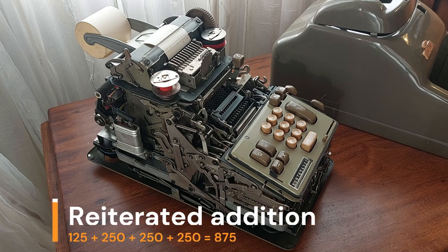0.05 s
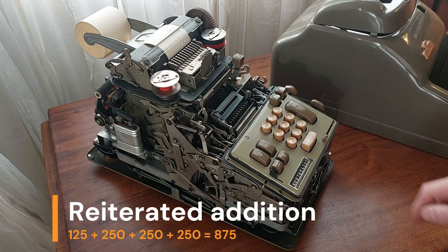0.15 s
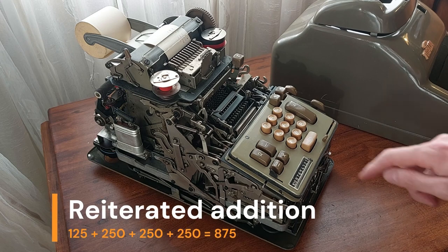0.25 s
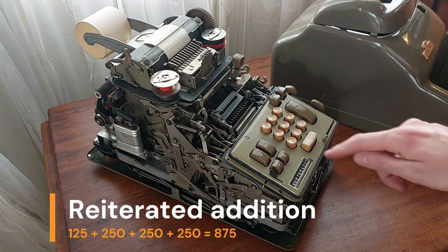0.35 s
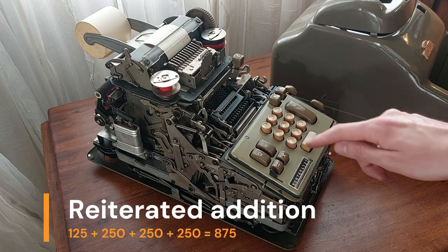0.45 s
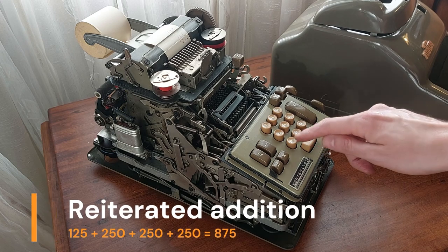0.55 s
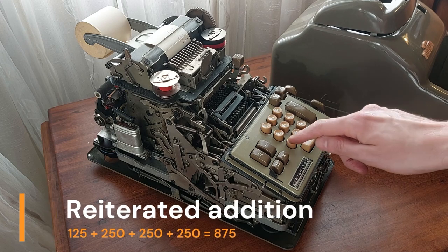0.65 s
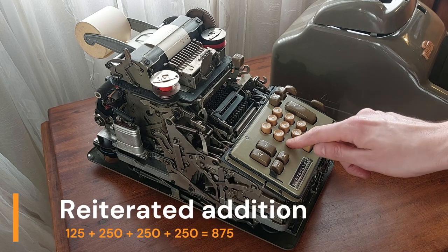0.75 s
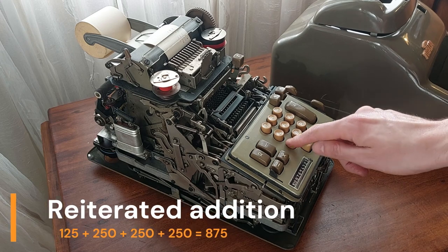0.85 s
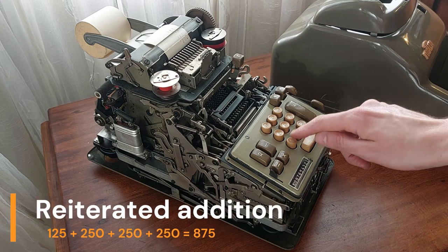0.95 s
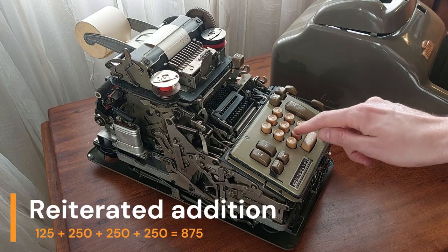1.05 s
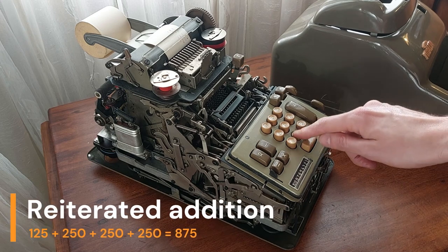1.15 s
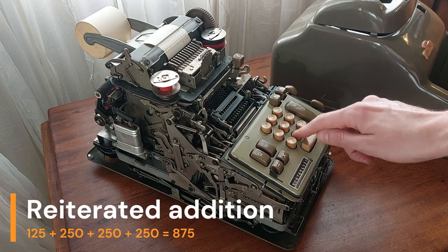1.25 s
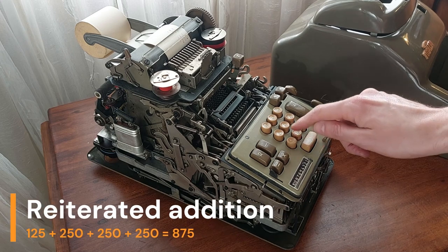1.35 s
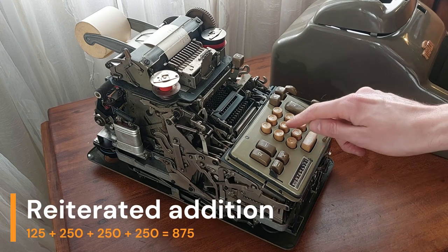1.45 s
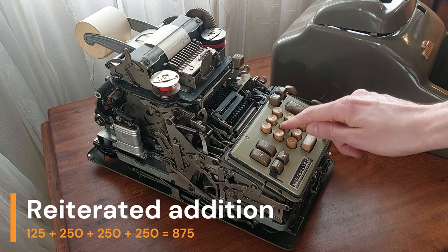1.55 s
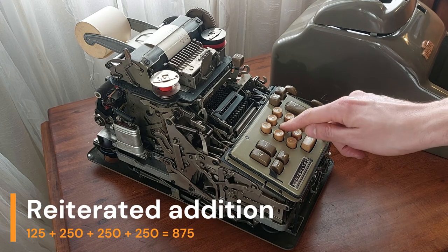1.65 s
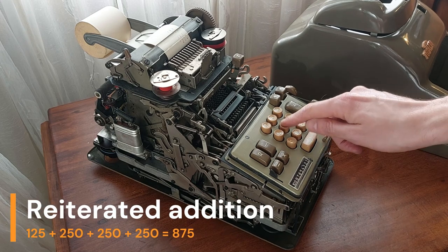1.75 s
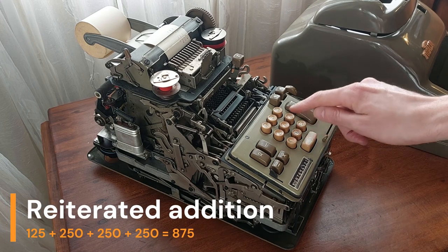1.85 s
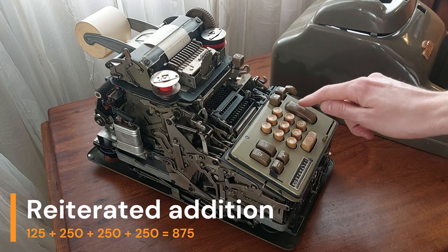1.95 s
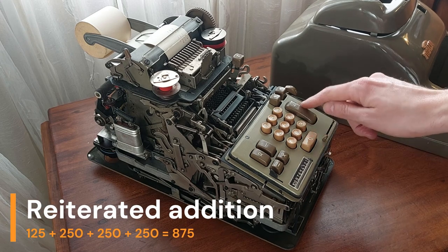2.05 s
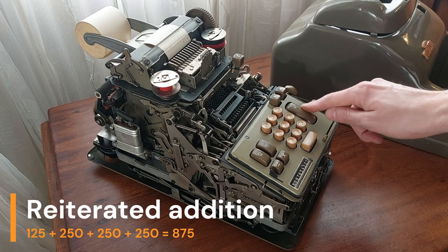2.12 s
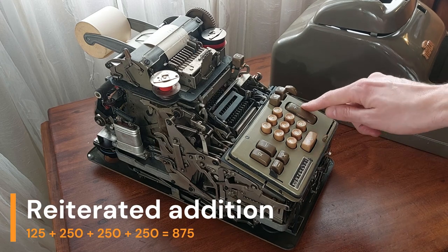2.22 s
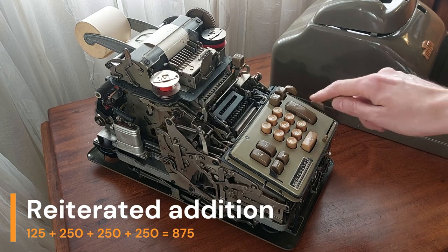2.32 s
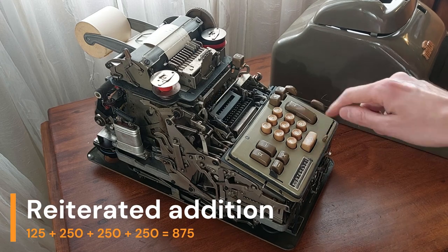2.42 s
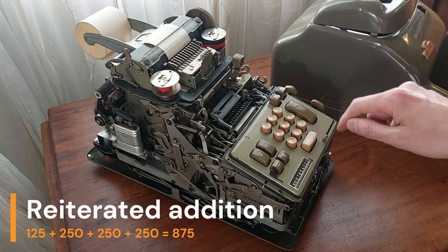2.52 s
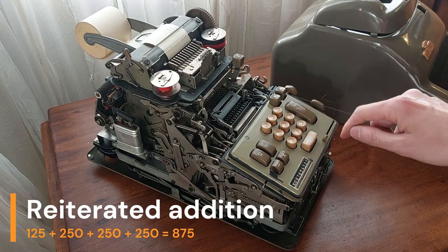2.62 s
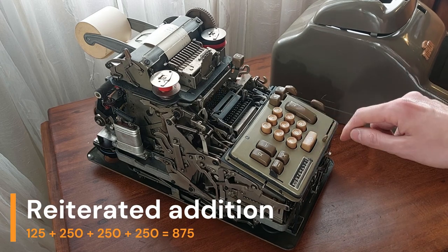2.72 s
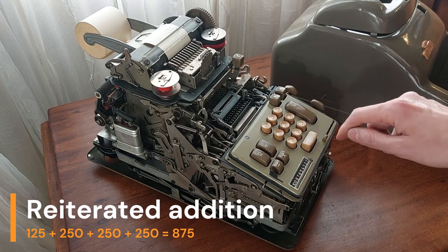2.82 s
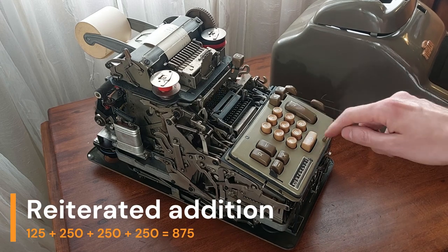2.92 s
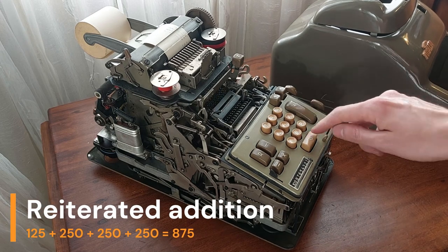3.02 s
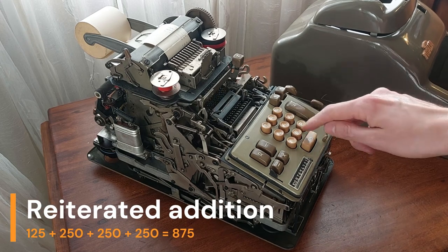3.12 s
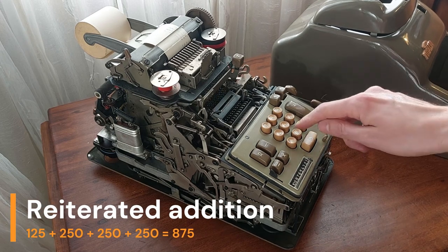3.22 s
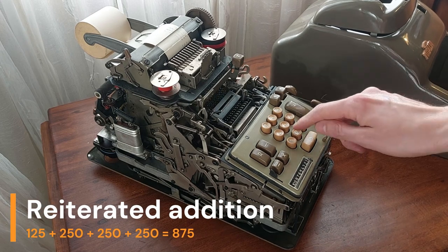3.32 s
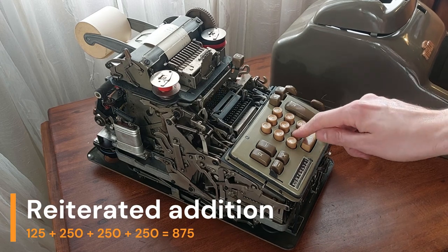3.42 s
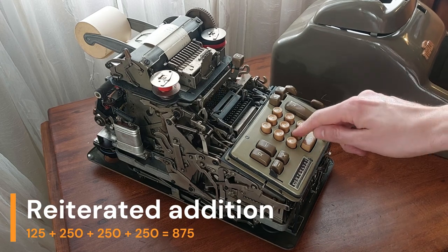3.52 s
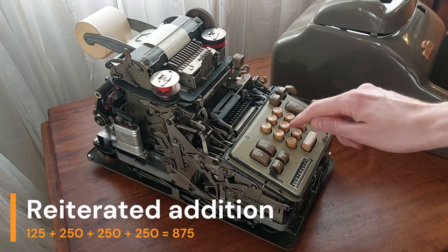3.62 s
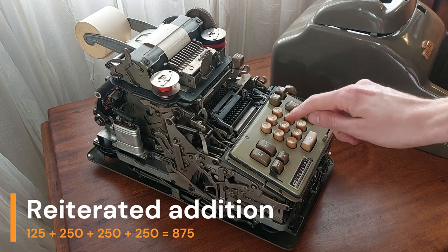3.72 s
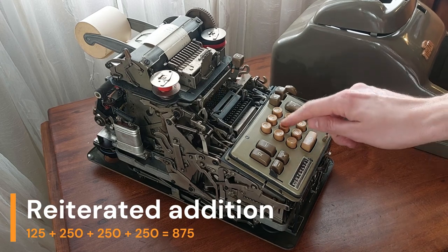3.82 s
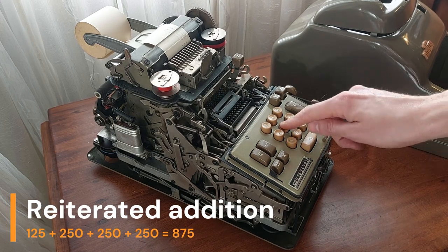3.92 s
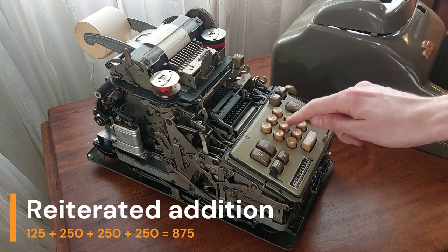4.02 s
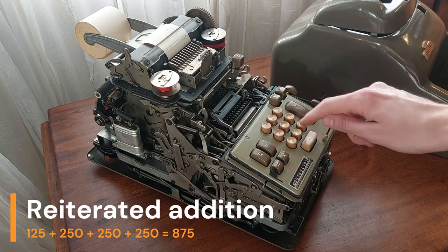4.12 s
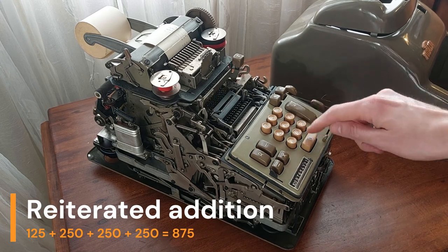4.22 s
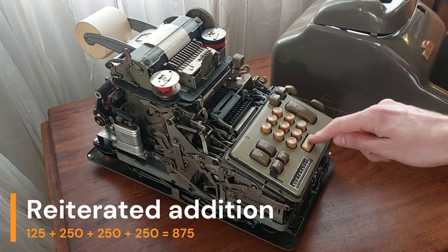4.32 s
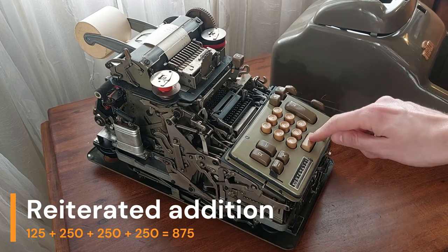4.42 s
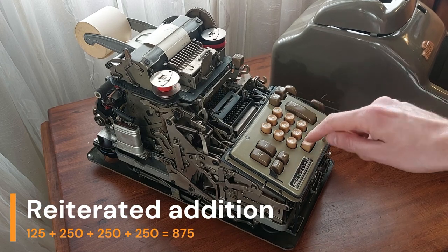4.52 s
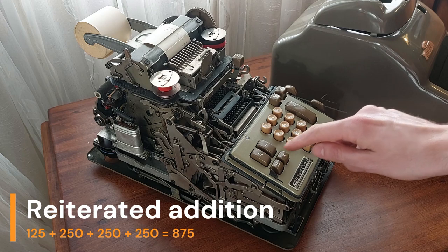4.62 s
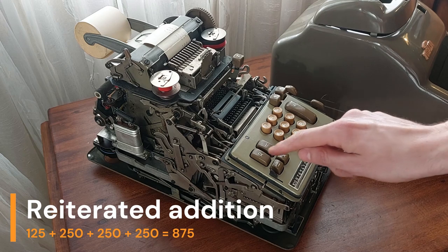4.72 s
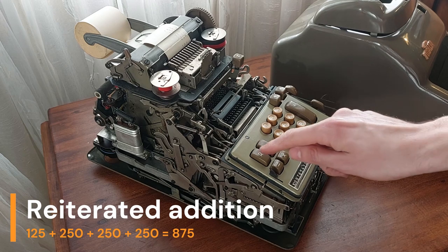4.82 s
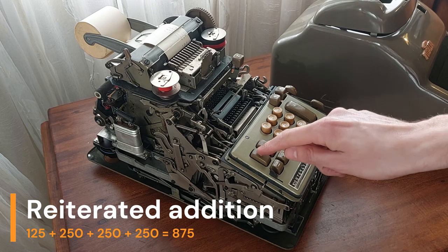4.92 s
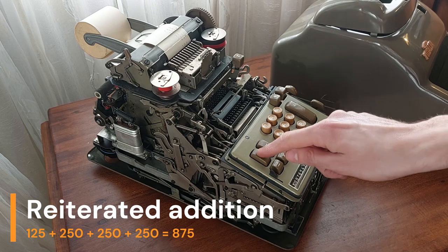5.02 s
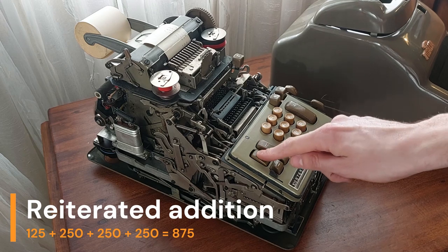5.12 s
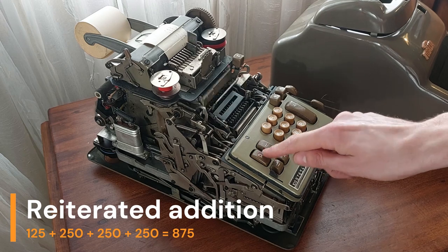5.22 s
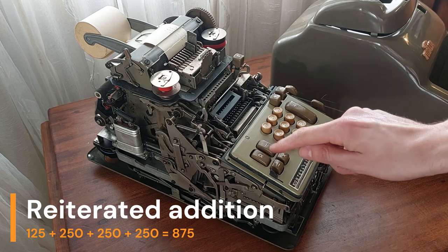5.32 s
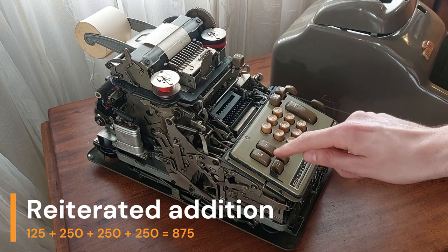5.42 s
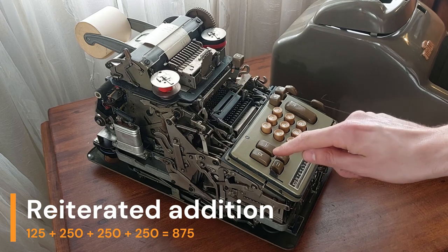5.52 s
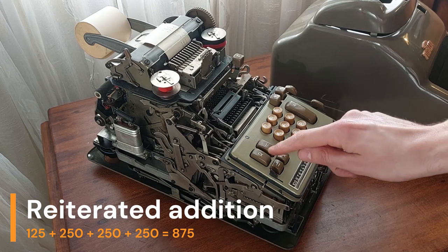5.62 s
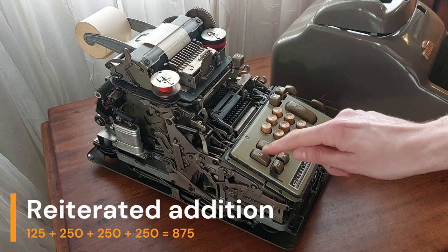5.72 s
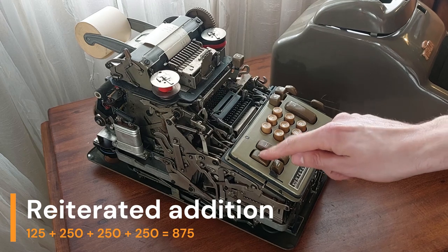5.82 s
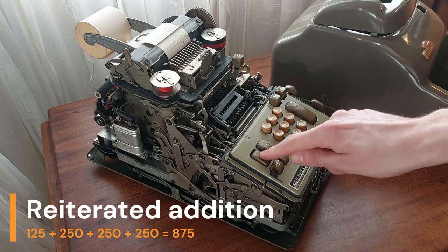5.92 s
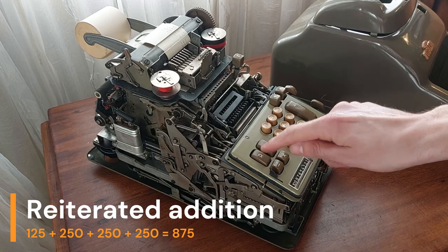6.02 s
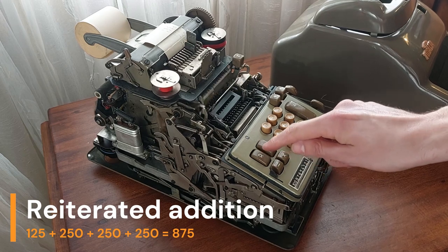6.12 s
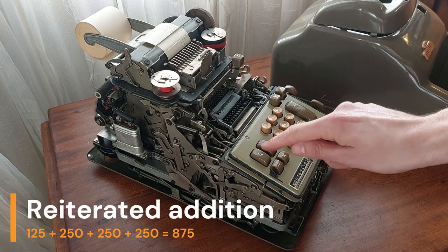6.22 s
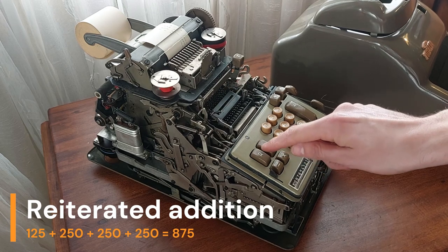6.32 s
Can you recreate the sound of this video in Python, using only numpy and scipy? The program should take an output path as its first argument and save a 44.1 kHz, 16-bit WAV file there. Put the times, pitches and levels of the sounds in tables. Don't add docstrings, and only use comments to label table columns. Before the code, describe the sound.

Close up in a small room, a mechanical adding machine's keys clack down and spring back, between short bursts of motor-driven metallic clatter.

```python
import sys
import numpy as np
from scipy import signal
from scipy.fft import rfft, irfft, next_fast_len
from scipy.io import wavfile

SR = 44100
rng = np.random.default_rng(int(sys.argv[2]) if len(sys.argv) > 2 else 0)


def materialize(psi):
    bounded = np.clip(np.atleast_2d(psi).T, -1, 1)
    quanta = np.round(bounded * 32767).astype(np.int16)
    wavfile.write(sys.argv[1], SR, quanta)


def volts_from_db(level):
    exponent = np.asarray(level, float) / 20
    return 10 ** exponent


N = 280035
SIZE = next_fast_len(N)
FREQ = np.maximum(np.fft.rfftfreq(SIZE, 1 / SR), 1)
TIME = np.arange(N) / SR

# (snap time [s], snap level [dB], travel from first contact [ms], contact level [dB],
# bottoming level [dB])
KEYS_DOWN = [
    (0.9922, -1, 21, -22, -25),
    (1.4123, -4.5, 41, -20.5, -19),
    (1.8576, -12.5, 23, -21.5, -13),
    (3.6581, -17.5, 18, -28, -35),
    (4.129, -16, 17.4, -18, -11.5),
    (4.5628, -13.5, 10.2, -13, -12),
]
# (stop time [s], stop level [dB], catch level [dB], rebound delay [ms],
# thump over click [dB])
KEYS_UP = [
    (1.1963, -14.5, -22.5, 13.6, -18),
    (1.5845, -13, -26, 13.4, -12.5),
    (2.0325, -14.5, -23.5, 2.3, -16.5),
    (3.8433, -18.5, -32.5, 12.2, -18.5),
    (4.2674, -13, -25, 21.9, -12.5),
    (4.724, -15.5, -17.5, 9.8, -15),
]
# (time [s], click level [dB], clack over click [dB])
BARS = [
    (2.36, -28, -7),
    (5.3278, -21.5, -9),
    (6.107, -21.5, -8),
]
# (time [s], level [dB])
STRAY = [(1.4624, -22.5), (1.848, -33), (2.3437, -32), (3.705, -30), (4.688, -27), (4.7494, -46),
         (6.0972, -40)]
# (clutch time [s], strength [dB], pace [1 = from rest], head start of turning rotor [ms])
CYCLES = [
    (2.391, -0.1, 1.001, .01),
    (5.3676, 0.64, .999, 0.0063),
    (6.1454, -2, .945, 11),
]
# (time after clutch [ms], click [dB], then over the click: thump [dB], clack [dB],
# fizz [dB])
CAM_BLOWS = [(-25, -17, -7, -12, -12), (-13, -16, -14, -8, -15), (0, -6, -16, -18, -16),
             (62.5, -9, -6, -18, -13), (73, -9, -10, -19, -15), (85.5, -10, -6, -21, -11),
             (126, -12, -14, -18, -4), (166, -15, -12, -8, -12), (173, -10, -12, -9, -7),
             (195, -20, -12, -12, -14), (229, -13, -16, -8, -16), (316, -12, -3, -20, -13)]
# (time [s], click [dB], thump [dB], clack [dB])
RACKS = [(2.406, -10, -34, -14), (2.4284, -17.5, -16, 2), (2.4986, -10, -34, -15), (2.6118, -12.5, 3, -21),
         (2.644, -8, -17, -20), (2.6788, -10.5, -1, -6), (2.7338, -8.5, -6.5, -10), (2.745, -9, -7, -6),
         (2.7794, -31.5, 7.5, 2), (5.3982, -13, -9, -4), (5.6176, -11.5, -3, -11), (5.648, -17.5, -6, -3),
         (5.708, -20, -33, -7), (5.7316, -8, -9, -34), (5.761, -30, 3, 3), (6.1646, -31, -17, 12)]
# (time after clutch [ms], gear chatter [dB], shaking of the frame [dB])
LOAD = [
    (-32.5, -71.5, -32),
    (11.5, -45.5, -40.5),
    (133.5, -30, -9),
    (160, -33.5, -22),
    (214.5, -35, -10.5),
    (288.5, -32.5, -34),
    (395, -30.5, -37),
    (453.5, -60, -23),
]
# (thump over click [dB], clack [dB], fizz [dB], rattle [ms])
GRAZE = (-14.5, -11, -9, 4)
CONTACT = (-27.5, -10, -7, 6.5)
SNAP = (-11.5, -15, -17, 8)
BOTTOM = (-16.5, -9, -11, 5.5)
CATCH = (-14, -8.5, -13.5, 12)
REBOUND = (-14.5, -7.5, -15.5, 5.5)
# (clack over click [dB], fizz [dB], rattle [ms])
STOP = (-10.5, -7.5, 10.6)
# (thump over click [dB], fizz [dB], rattle [ms])
BAR = (-1.5, -9.5, 11)
# (rise [ms], snap over rattle [dB])
ATTACK_DOWN = (.5, 4.5)
ATTACK_TOUCH = (4.9, -9.5)
ATTACK_UP = (1.6, -10.5)
ATTACK_RUN = (1.6, -8)
# (frequency [Hz], density [dB per Hz])
STEEL_DOWN = [(410, -34), (700, -14.5), (1260, -20), (1420, -9), (1860, -8.5), (2290, -3), (3480, -11),
              (7040, -9.5), (10500, -14.5), (14400, -7), (15800, -10.5)]
STEEL_UP = [(410, -33), (700, -7.5), (1130, -13.5), (1400, -4.5), (1550, -9), (3970, -12.5), (5860, -12.5),
            (6770, -12), (7040, -6.5), (7810, -23.5), (15800, -9.5)]
STEEL_RUN = [(410, -32), (700, -10), (1080, -10), (1890, -2), (2550, 0), (3180, -8.5), (4400, -4),
             (8340, -9.5), (9630, -6.5), (13200, -9), (15800, -2)]
PAWL_HZ = [1250, 1650, 2150, 2700, 3400, 4300, 5200, 6600]
# (frequency [Hz], level [dB], T60 [s])
HAMMER = [(1484, -9.5, 0.086), (1720, -5.5, .035), (1946, -2.2, 0.031), (2257, -3.5, .03), (2550, 2, 0.02)]
# (time after clutch [ms], level [dB], flurry [ms])
HAMMER_BLOWS = [(164.5, -37, 3.5), (177, -39.5, 6.5), (196, -43, 3.6), (229, -38.5, 2.1)]
# (frequency [Hz], level [dB])
LATCH = [(2820, -41.5), (2154, -38.5), (2125, -42), (2190, -51), (2060, -54.5), (3080, -43)]
# (frequency [Hz], T60 [s], level at each key stop [dB])
RINGS = [(7224, .105, -53), (11290, .14, -61), (5728, .12, -55), (1421, .045, -46), (13560, .08, -70)]
# (time [s], frequency [Hz], level [dB])
LOUD_RINGS = [
    (1.588, 5728, -47),
    (3.846, 11290, -47),
    (4.724, 7224, -39),
    (4.724, 5728, -53),
    (5.710, 13560, -28),
]
# (frequency [Hz], level for pushes down [dB], level for knocks up [dB], T60 [s])
BOOM = [(77, -17, -10, 0.1), (98.5, -12, -13, 0.55), (108.6, -7, -10, 0.14), (174, -19.5, -8.5, 0.069),
        (185, -11, -5.5, 0.16), (222.3, -2.5, -8.5, .2), (260.2, 0, -5, 0.15), (289, -2.5, 3, 0.15),
        (322.6, -4.5, -4, 0.21), (334, -2, -2, 0.36), (383.6, -7, -7, .15), (387.2, -8, 3, 0.3),
        (434.4, -5.5, 6, 0.074), (488, -11.5, -9.5, 0.31), (523.3, -18.5, -12, 0.24),
        (575.3, -21, -14.5, 0.086), (671, -15.5, -10, 0.28), (729, -15.5, -13, 0.078),
        (694, -24, -27.5, 0.033)]
# (frequency [Hz], density [dB per Hz])
WHIRR = [(820, -31.5), (1400, -8), (1600, -11), (1870, -5), (2110, -9), (3490, -13), (4750, -2.5),
         (5320, -6.5), (5890, -2.5), (9850, -7), (10700, -3.5), (15200, -10), (16300, -19)]
# (frequency [Hz], width [Hz], level [dB])
BEARING = [(1000, 90, -2), (1150, 110, 0), (1310, 90, -3), (1800, 90, -9)]
# (whirr [dB], bearing groan [dB], shaking [dB]); the slope in [dB/s]
COAST_DB = (-42, -56.5, -38.5)
SAG_DB_PER_S = (-50.5, -92, -59.5)
# (whirr [dB], bearing groan [dB], shaking [dB])
REST_DB = (-36, -24, -26)
# (frequency [Hz], T60 [s])
ROOM_T60 = [(100, 0.39), (700, 0.29), (4800, 0.4), (12800, 0.22)]
# (frequency [Hz], left minus right [dB])
BALANCE_DB = [(60, 0.5), (110, 1.0), (200, -3.5), (380, 0.0), (700, 2.0), (1290, 2.5), (2380, 3.5),
              (4400, 5.0), (8120, 5.5), (15000, 3.0)]
# (frequency [Hz], level [dB])
HUM = [(285, -66), (377, -80), (447, -86), (748, -92)]
# (time [s], level [dB])
HUM_FADE = [(2.85, -30), (2.98, 3), (3.3, 1), (3.62, -3)]
# (time [s], level [dB])
DRONE = [(4.9, -82), (5.05, -66), (5.2, -62), (5.33, -63)]
# (frequency [Hz], density [dB per Hz])
AIR = [(12, -45.5), (20, -16), (43, -1), (60, -3.5), (77, -10), (124, -5.5), (164, -14), (279, -9.5),
       (413, -25.5), (476, -24.5), (1310, -36), (5500, -47.5), (16300, -46)]
# (frequency [Hz], correlation [-1 to 1])
AIR_LIKE = [(60, 0.29), (130, 0.42), (290, 0.74), (640, -0.31), (1410, -0.79), (3100, -0.42), (6820, 0.26),
            (15000, -0.04)]
# (time [s], level [dB])
SQUEAK = [(.62, -104), (.66, -90), (.8, -88), (.95, -93)]


def unit(x):
    return x / np.sqrt(np.mean(x ** 2))


def on_log(table, at_hz=FREQ):
    hz, value = np.transpose(table)
    return np.interp(np.log(at_hz), np.log(np.maximum(hz, 1)), value)


def colour(x, gain):
    return irfft(rfft(x, SIZE) * gain, SIZE)[..., :N]


def band(lo_hz, hi_hz):
    return 1 / np.sqrt((1 + (lo_hz / FREQ) ** 4) * (1 + (FREQ / hi_hz) ** 4))


def gain_curve(spans, col):
    total = 0
    for span in spans:
        times, levels = np.transpose(span)[[0, col]]
        total = total + volts_from_db(np.interp(TIME, times, levels, left=-200, right=-200))
    return total


def ring(force, hz, t60):
    pole = np.exp(2j * np.pi * hz / SR - np.log(1000) / (max(t60, .001) * SR))
    return signal.lfilter([0, pole.imag], [1, -2 * pole.real, abs(pole) ** 2], force + 1e-18)


def bursts(times, dbs, decays_ms, rise_ms, snap_db=-99):
    out, t_ms = np.zeros(N + 2048), np.arange(2048) / SR * 1000
    for s, db, decay, rise, snap in np.broadcast(times, dbs, decays_ms, rise_ms, snap_db):
        i = int(s * SR)
        fall = np.exp(-t_ms / max(decay, .3)) + volts_from_db(snap) * np.exp(-t_ms / 0.65)
        out[i:i + len(t_ms)] += volts_from_db(db) * fall * (1 - np.exp(-t_ms / max(rise, .1)))
    return out[:N]


def pair(alike_hz):
    shared, left, right = rng.standard_normal((3, N))
    like = 1 / (1 + (FREQ / alike_hz) ** 2)
    shared = colour(shared, np.sqrt(like))
    own = colour(np.array([left, right]), np.sqrt(1 - like))
    return np.array([shared, np.roll(shared, 4)]) + own


def grit(scatter_db, grain_ms):
    size = np.repeat(rng.exponential(size=N), max(int(grain_ms * SR / 1000), 1))[:N]
    return unit(volts_from_db(scatter_db * size) * pair(2300))


def clock(cycle, ms):
    clutch, _, pace, early = cycle
    spin_up_ms = 13
    return clutch + (pace * ms - early * (1 - np.exp(-max(ms, 0) / spin_up_ms))) / 1000


def blows():
    press, touch, release, cycle = [], [(s, db, *BOTTOM) for s, db in STRAY], [], []
    for s, db, travel, contact, bottom in KEYS_DOWN:
        hard = db + 13.5
        first = s - travel / 1000
        thump, rattle_ms = SNAP[0] - .55 * hard, SNAP[3] * np.exp(-hard / 10.5)
        press += [(s, db, thump, *SNAP[1:3], rattle_ms)]
        touch += [(first - .0069, contact - 3, *GRAZE)]
        touch += [(first, contact, *CONTACT), (s + .018, bottom, *BOTTOM)]
    for s, db, catch, after, thump in KEYS_UP:
        release += [(s - .0118, catch, *CATCH), (s, db, thump, *STOP)]
        release += [(s + after / 1000, db - 7.5, *REBOUND)]
    cycle += [(s, db, BAR[0], clack, *BAR[1:]) for s, db, clack in BARS]
    cam_rattle_ms, rack_fizz_db, rack_rattle_ms = 6.73, -9, 5.2
    for c in CYCLES:
        for ms, db, *row in CAM_BLOWS:
            if clock(c, ms) < N / SR:
                cycle += [(clock(c, ms), db + c[1], *row, cam_rattle_ms)]
    cycle += [(*row, rack_fizz_db, rack_rattle_ms) for row in RACKS]
    return press, touch, release, cycle


def drive():
    return [[(clock(c, ms), gear + c[1], shake + c[1]) for ms, gear, shake in LOAD] for c in CYCLES]


def coast():
    free_ms, grab_ms, stick_ms, rest_ms = 476, 665, 770, 930
    ms = np.array([free_ms, grab_ms, grab_ms + 40, stick_ms, rest_ms])
    db = np.array(COAST_DB) + np.outer(np.minimum(ms, stick_ms) - free_ms, SAG_DB_PER_S) / 1000
    db = db + np.outer(ms > grab_ms, [0, 15, 0])
    db = db + np.outer(ms > stick_ms, REST_DB)
    return [[(clock(c, m), *row) for m, row in zip(ms, db)] for c in CYCLES]


def clatter():
    press, touch, release, cycle = blows()
    s, db, _, clack, fizz, ms = np.transpose(press + touch + release + cycle)
    centres = 720 * 2 ** (np.arange(14) / 3)
    steels = [STEEL_DOWN] * len(press + touch) + [STEEL_UP] * len(release) + [STEEL_RUN] * len(cycle)
    attacks = [ATTACK_DOWN] * len(press) + [ATTACK_TOUCH] * len(touch)
    attacks += [ATTACK_UP] * len(release) + [ATTACK_RUN] * len(cycle)
    rise_ms, snap_db = np.transpose(attacks)
    tilt = np.array([on_log([(2000, c + 8.48), (5000, 0.001), (11000, f + 11.5)], centres)
                     for c, f in zip(clack, fizz)])
    patchy = 2.8 * rng.standard_normal((len(s), len(centres)))
    width_db = 10 * np.log10(centres / 16000)
    steel_db = np.array([on_log(steel, centres) for steel in steels])
    band_db = db[:, None] + steel_db + tilt + patchy + width_db
    contacts, gears, out = rfft(grit(0.43, .4), SIZE), gain_curve(drive(), 1), 0
    for k, hz in enumerate(centres):
        window = np.exp(-(3 * np.log2(FREQ / hz)) ** 2 * 1.4)
        part = unit(irfft(contacts * window, SIZE)[:, :N])
        fall_ms = ms * (hz / 5000) ** -.1
        struck = bursts(s, band_db[:, k] - 9.5, fall_ms, rise_ms, snap_db)
        chatter = gears * volts_from_db(on_log(STEEL_RUN, hz) + width_db[k] - 2.0)
        out = out + (struck + chatter) * part
    return out


def pawls():
    load, out = gain_curve(drive(), 1) * volts_from_db(8), 0
    for hz in PAWL_HZ:
        hit = rng.random(N) < 22 / SR
        out = out + ring(load * hit * rng.standard_normal((2, N)), hz, .018)
    return out


def knocks():
    shared, left, right = rng.standard_normal((3, N))
    rattle = np.array([left, right]) + 0.25 * shared
    tick, out = np.zeros(N), 0
    latch_t60 = .045
    for (s, snap, *_), (hz, db) in zip(KEYS_DOWN, LATCH):
        tick[int((s + .0008) * SR)] = volts_from_db(snap - 17.5)
        latch = bursts(s, [db], 3.0, .5) * rattle
        out = out + ring(latch, hz, latch_t60) + ring(latch, hz * 1.07, latch_t60 / 2)
    struck = [(clock(c, at), d + c[1], m) for c in CYCLES for at, d, m in HAMMER_BLOWS
              if clock(c, at) < N / SR]
    s, db, ms = np.transpose(struck)
    hammer = bursts(s, db, ms, 1.0) * rattle
    hammers = sum(volts_from_db(d) * ring(hammer, hz, t60) for hz, d, t60 in HAMMER)
    return out + ring(tick, 3000, .0025) + hammers


def rings():
    out = 0
    for hz, t60, db in RINGS:
        tap = np.zeros(N)
        taps = [(key[0], db) for key in KEYS_UP] + [(s, d) for s, f, d in LOUD_RINGS if f == hz]
        for s, size in taps:
            tap[int(s * SR)] += volts_from_db(size + 6)
        low, high = ring(tap, hz, t60), ring(tap, hz * 1.005, t60 / 2)
        out = out + np.array([low + high, low - high])
    return out


def push(blows, rise_ms, fall_ms):
    s, db, thump, *_ = np.transpose(blows)
    return bursts(s, db + thump, fall_ms, rise_ms)


def boom():
    press, touch, release, cycle = blows()
    shaking = gain_curve(drive(), 2) * volts_from_db(-19.0) + gain_curve(coast(), 3) * volts_from_db(-13.5)
    down = (push(press + touch + cycle, 5.6, 9.46) + shaking) * rng.standard_normal(N)
    up = push(release, 0.47, 7.4) * rng.standard_normal(N)
    longest_t60, out = .09, 0
    for k, (hz, down_db, up_db, t60) in enumerate(BOOM):
        force = volts_from_db(down_db) * down + volts_from_db(up_db) * up
        out = out + (-1) ** k * ring(force, hz, min(t60, longest_t60))
    thud = volts_from_db(4.5) * colour(down + up, band(240, 610))
    return volts_from_db(-23.5) * colour(out, band(37, 2000) ** 2) + thud


def coasting():
    rub = (1 + 0.17 * np.sin(2 * np.pi * 32 * TIME)) * grit(2.4, 0.81)
    peaks = sum(volts_from_db(db) / (1 + (2 * (FREQ - hz) / width) ** 2) for hz, width, db in BEARING)
    whirr = gain_curve(coast(), 1) * unit(colour(rub, volts_from_db(on_log(WHIRR))))
    throb_db = -2.0 + 4.0 * np.sin(2 * np.pi * 10.0 * TIME + 1.8)
    groan = gain_curve(coast(), 2) * unit(colour(rub, peaks))
    return volts_from_db(-5.0) * whirr + volts_from_db(throb_db) * groan


def room(x):
    t = np.maximum(TIME[:SR] - .003, 0)
    noise, tail = rfft(pair(560)[:, :SR]), 0
    hz = np.maximum(np.arange(SR // 2 + 1), 1)
    for centre in 62.5 * 2 ** np.arange(9):
        fade = np.log(1000) / on_log(ROOM_T60, centre)
        part = irfft(noise * np.exp(-np.log2(hz / centre) ** 2 * 2), SR)
        tail = tail + part * np.sqrt(2 * fade / SR) * np.exp(-fade * t) * (1 - np.exp(-t / 0.00043))
    return signal.fftconvolve(x, tail, axes=1)[:, :N]


def narrow(hz):
    return unit(colour(rng.standard_normal(N), 1 / (1 + ((FREQ - hz) / 4) ** 2)))


def hums():
    casing = sum(volts_from_db(db) * narrow(hz) for hz, db in HUM)
    return gain_curve([HUM_FADE], 1) * casing + gain_curve([DRONE], 1) * narrow(121)


def air():
    like = np.clip(on_log(AIR_LIKE), 0, .95)
    mid, side = (colour(rng.standard_normal(N), volts_from_db(on_log(AIR)) * np.sqrt(1 + sign * like))
                 for sign in (1, -1))
    wander = unit(colour(rng.standard_normal(N), band(.3, 3)))
    skin = colour(rng.standard_normal((2, N)), 1 / (1 + ((FREQ - 4750) / 300) ** 4))
    squeak = gain_curve([SQUEAK], 1) * unit(skin)
    return volts_from_db(-66.5 + 1.5 * wander) * unit(np.array([mid + side, mid - side])) + squeak


def scene():
    steel = clatter() + rings() + coasting()
    body = boom()
    near = steel + body + room(volts_from_db(-4.0) * steel + volts_from_db(-1.5) * body)
    near = near + knocks() + pawls()
    lean = on_log(BALANCE_DB) / 2
    machine = np.array([colour(near[0], volts_from_db(lean)), colour(near[1], volts_from_db(-lean))])
    return machine + air() + hums()


def top_cut(x):
    return signal.sosfilt(signal.butter(12, 16440, fs=SR, output="sos"), x)


def record(dry):
    cut = signal.ellip(10, .3, 60, 16000, fs=SR, output="sos")
    return top_cut(signal.sosfilt(cut, dry))


dry = scene()
out = record(dry)
materialize(out)
```